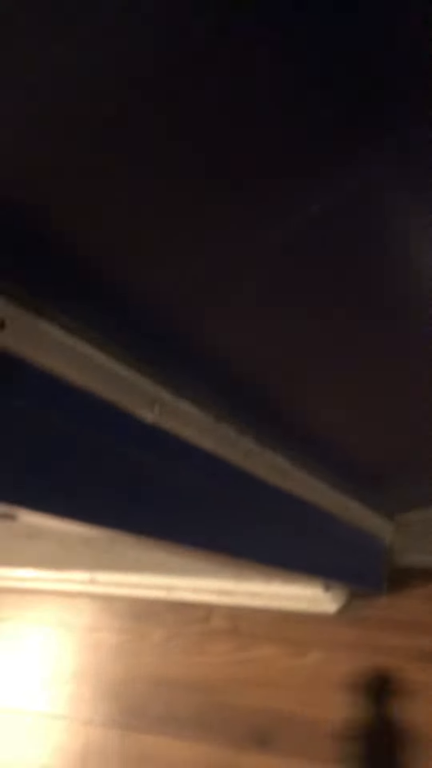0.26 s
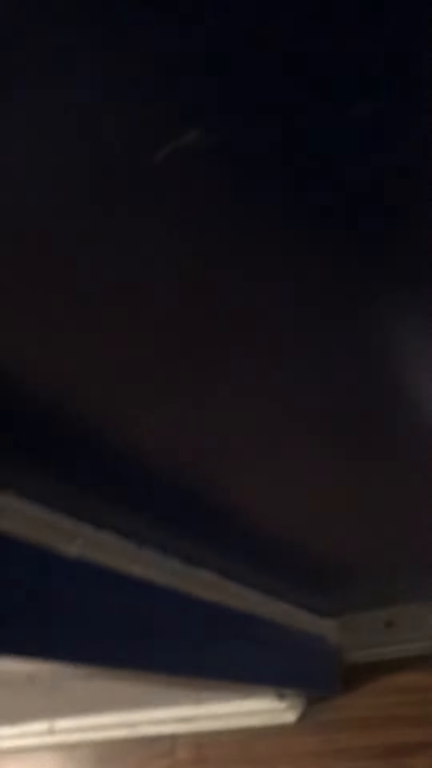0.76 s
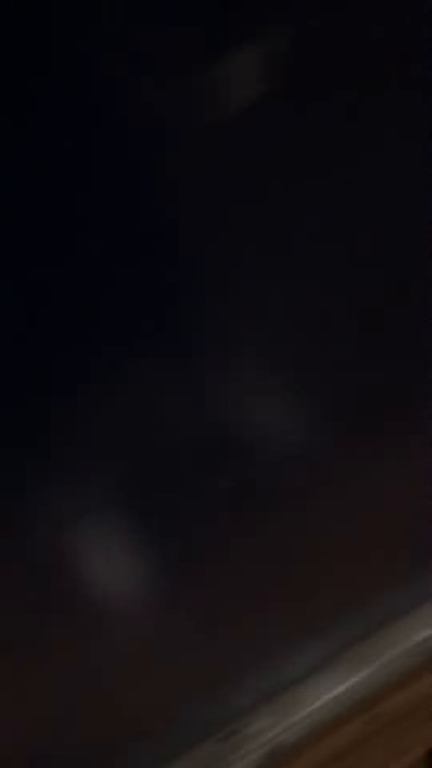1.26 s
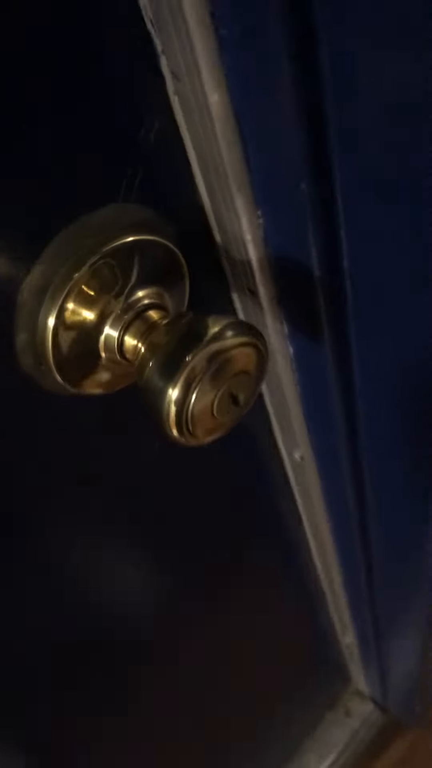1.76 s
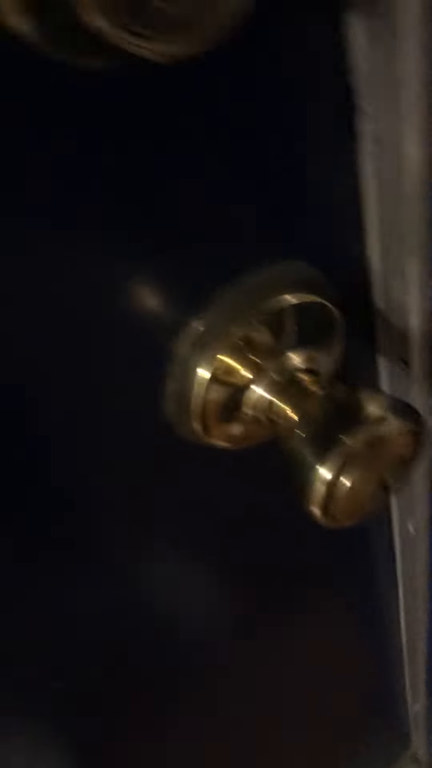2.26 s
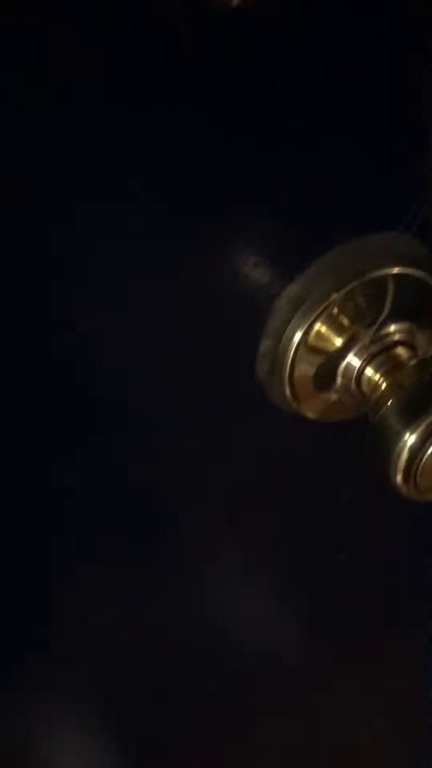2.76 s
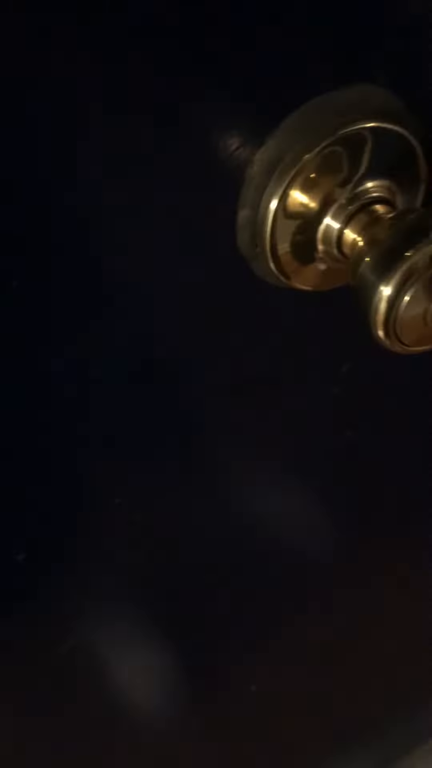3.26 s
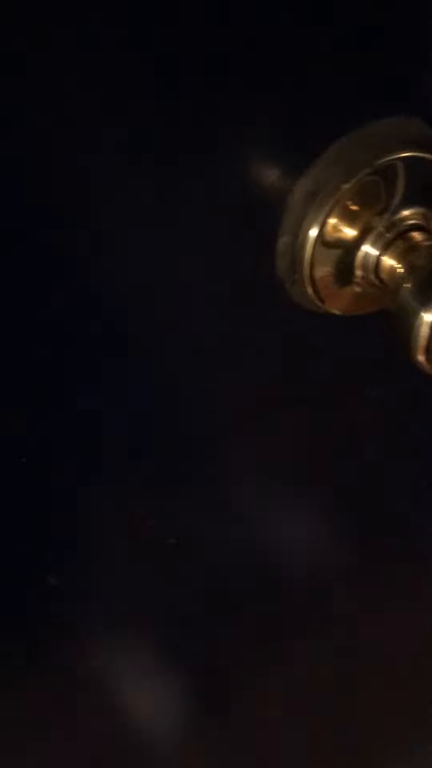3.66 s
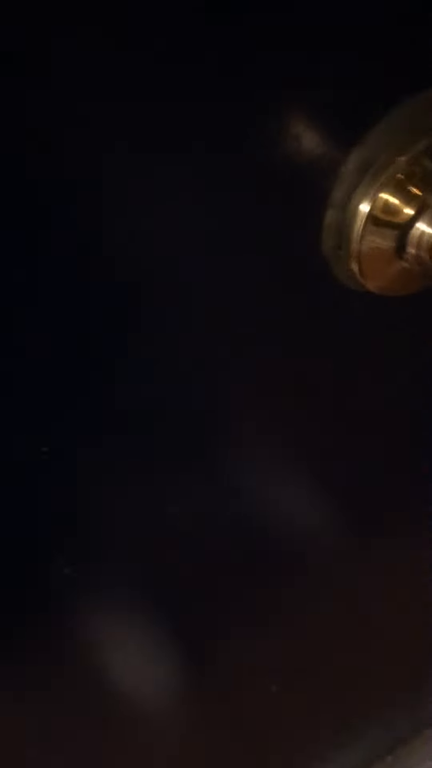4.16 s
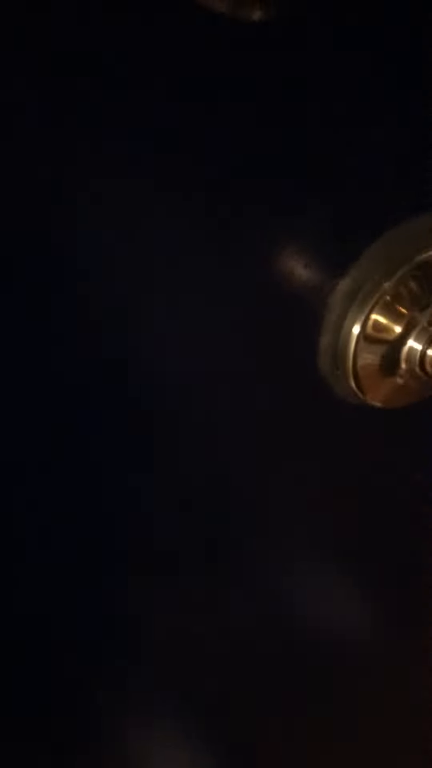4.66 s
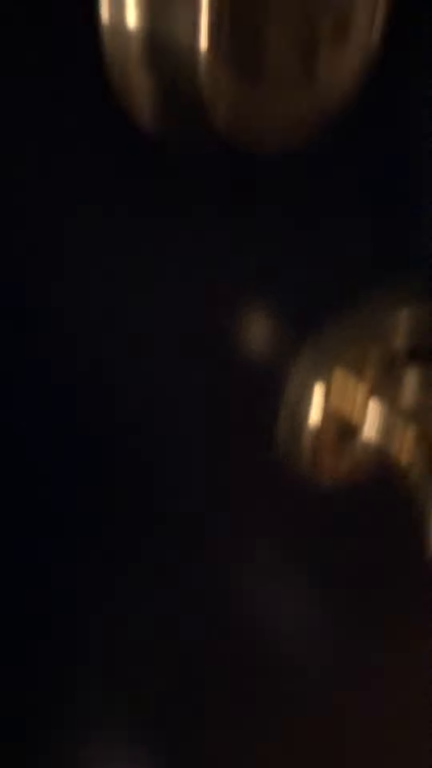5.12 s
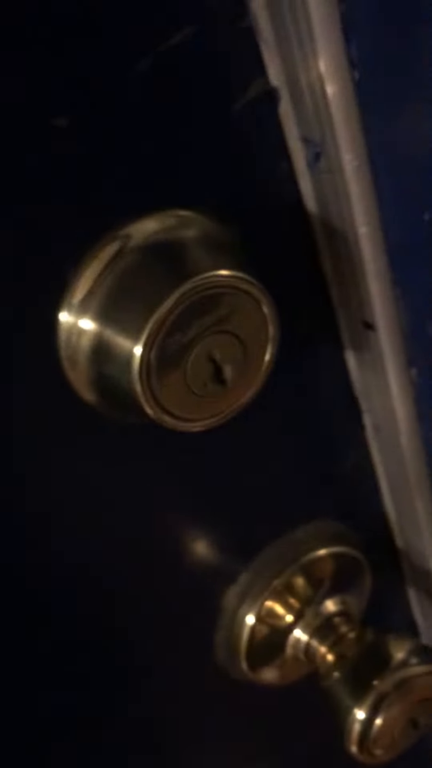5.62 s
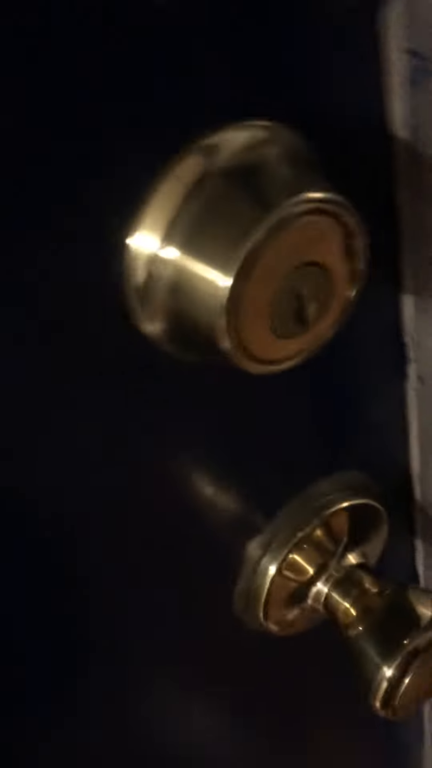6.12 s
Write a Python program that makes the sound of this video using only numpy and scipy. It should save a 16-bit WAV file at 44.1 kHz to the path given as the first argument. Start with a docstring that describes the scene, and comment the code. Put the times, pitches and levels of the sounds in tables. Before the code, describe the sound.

Door pushed shut with a rattling wooden thump, a brief sleeve rustle, then keys sorted in the hand, clinking ever more busily.

```python
"""Close to the microphone a bunch of keys is sorted in the hand: cracks, chatter and brass rings in four bands,
over a patter of tiny contacts; one small steel piece clicks with modes of its own.
Before that a wooden house door is pushed shut: noise bursts for latch and wood, ringing panel modes, low air sways.
A sleeve rustles as shaped, grainy noise. Behind it all lie the hallway's rumble and a soft background hiss,
both coloured noise."""
import sys
import numpy as np
from scipy import signal
from scipy.fft import rfft, irfft, next_fast_len
from scipy.io import wavfile
from scipy.ndimage import uniform_filter1d

SR = 44100
rng = np.random.default_rng(int(sys.argv[2]) if len(sys.argv) > 2 else 0)


def output_pcm(signal):
    """Save a mono or channel-first signal as 16-bit PCM at the path in sys.argv[1].

    Samples are clipped to [-1, 1] before scaling.
    """
    pcm = np.clip(np.atleast_2d(signal).T, -1, 1) * 32767
    wavfile.write(sys.argv[1], SR, np.round(pcm).astype(np.int16))


N = 281799  # length in samples


def amp(db):
    """Decibels to gain."""
    return 10 ** (np.asarray(db) / 20)


def unit(x):
    """Scale to rms 1."""
    return x / np.sqrt(np.mean(x ** 2) + 1e-20)


def strike(x):
    """Scale a hit so that its first 10 ms have rms 1."""
    return x / np.sqrt(np.mean(x[:SR // 100] ** 2) + 1e-20)


def along(points, hz):
    """Interpolate (Hz, value) points on a log frequency axis."""
    f, v = np.transpose(points)
    return np.interp(np.log(hz + 1), np.log(f + 1), v)


def curve(rows):
    """Interpolate (s, value) rows to one value per sample."""
    return np.interp(np.arange(N) / SR, *np.transpose(rows))


def fade(t60):
    """One second of exponential decay, falling 60 dB in t60 seconds."""
    return np.exp(-np.log(1000) * np.arange(SR) / SR / max(t60, 1e-3))


def add(track, s, sound):
    """Mix a sound in at time s."""
    start = max(round(s * SR), 0)
    track[start:start + len(sound)] += sound[:max(N - start, 0)]


def colour(x, spectrum):
    """Shape x by a smooth spectrum, at rms 1."""
    gain = amp(along(spectrum, np.fft.rfftfreq(len(x), 1 / SR)))
    return unit(irfft(rfft(x) * gain, len(x)))


def noise(spectrum, size=N):
    """Coloured noise of rms 1."""
    return colour(rng.standard_normal(size), spectrum)


def ring(modes, t60, scatter_db=0):
    """Clusters of close modes, excited differently at each point of contact."""
    hz = np.fft.rfftfreq(SR, 1 / SR)
    response = np.zeros(len(hz))
    for centre, width, db in modes:
        level = amp(db + scatter_db * rng.normal())
        response += level / (1 + ((hz - centre) / max(width, 2)) ** 2)
    random_phase = np.exp(2j * np.pi * rng.random(len(hz)))
    return unit(irfft(response * random_phase, SR)) * fade(t60)


def strokes(rows, rise, fall):
    """Gain of hand and arm movements: each swells, holds and dies away, at slopes in dB per s."""
    t = np.arange(N) / SR
    levels = []
    for start, length, db in rows:
        before = np.maximum(start - t, 0)
        after = np.maximum(t - start - length, 0)
        levels.append(db - rise * before - fall * after)
    return amp(np.max(levels, axis=0))


# Low rumble of the hallway, relative spectrum: f/Hz, level/dB
RUMBLE_SPECTRUM = [(12, -1), (20, -6), (49, 1.5), (61, 2), (76, -8), (102, -4), (173, -11.5), (296, -19),
                   (350, -23), (460, -29), (770, -120)]
# Background hiss, relative spectrum: f/Hz, level/dB
HISS_SPECTRUM = [(120, -17), (200, -2.5), (300, 1), (420, -2.5), (570, 4.5), (720, -4), (950, -1.5),
                 (1200, -7), (1500, -5.5), (1800, -9), (2250, -9), (3000, -13.5), (4200, -20.5),
                 (8000, -20.5), (12200, -20), (16000, -22)]
# Level of the background hiss: t/s, level/dB
HISS_LEVEL = [(0, -61.5), (.5, -59), (1.15, -56), (1.45, -63), (2.2, -56.5), (2.36, -63.5), (3.1, -59.5),
              (3.6, -60.5), (4.05, -66.5), (4.6, -60), (6.39, -65)]


def hallway():
    """Steady low rumble under a soft background hiss whose level is set over time."""
    rumble = amp(-61.5) * noise(RUMBLE_SPECTRUM)
    hiss = amp(curve(HISS_LEVEL)) * noise(HISS_SPECTRUM)
    return rumble + hiss


# Reverberation of the hallway walls: f/Hz, t60/s
WALL_DECAY = [(100, 0.69), (250, 1.0), (500, 0.72), (1500, 0.78), (4000, 0.98), (9000, 0.26), (16000, 0.44)]


def room(x):
    """The hallway's tail, 5 ms behind the direct sound: noise that decays at each frequency's own rate."""
    hz, t, z = signal.stft(rng.standard_normal(SR), SR, nperseg=256)
    decay = np.exp(-np.log(1000) * t / along(WALL_DECAY, hz)[:, None])
    tail = signal.istft(z * decay, SR, nperseg=256)[1]
    delayed = np.pad(tail / np.linalg.norm(tail), (SR // 200, 0))
    return signal.fftconvolve(x, delayed)[:N]


# Cloth brushing as the arm moves: start t/s, length t/s, level/dB
SLEEVE_STROKES = [(0, 1.0, -60), (1.14, .1, -50), (1.5, .03, -67), (2.18, 0.13, -70)]
# Brushed cloth, relative spectrum: f/Hz, level/dB
CLOTH_SPECTRUM = [(410, -56), (700, 0), (747, -5), (1090, -3), (1770, -1.5), (3370, -8), (4860, -2.5),
                  (7490, -5.5), (10700, 1), (16000, -18)]
# Strokes of ribbed fabric: start t/s, length t/s, level/dB
SWISH_STROKES = [(0, .025, -47), (1.14, 0.11, -52.5), (1.345, 0.087, -42), (1.53, 0.098, -55),
                 (5.76, 0.083, -54)]
# Sliding ribs, relative spectrum: f/Hz, level/dB
RIB_SPECTRUM = [(3000, -33), (4500, -14), (5000, 2), (5400, -0.5), (6200, -24), (8500, -14), (9700, 2.5),
                (11000, -3.5), (12500, -10), (16000, -14)]
SLEEVE_RISE_DB_PER_S, SLEEVE_FALL_DB_PER_S = 87, 140
SWISH_RISE_DB_PER_S, SWISH_FALL_DB_PER_S = 457, 330


def grain():
    """Gain that flickers finely at random, by 1.74 dB rms."""
    return amp(1.74 * unit(uniform_filter1d(rng.standard_normal(N), size=180)))


def sleeve():
    """Cloth brushes as the arm moves; sliding ribs give a pitched swish."""
    brush_gain = strokes(SLEEVE_STROKES, SLEEVE_RISE_DB_PER_S, SLEEVE_FALL_DB_PER_S)
    swish_gain = strokes(SWISH_STROKES, SWISH_RISE_DB_PER_S, SWISH_FALL_DB_PER_S)
    brush = brush_gain * noise(CLOTH_SPECTRUM) * grain()
    swish = swish_gain * noise(RIB_SPECTRUM) * grain()
    return brush + swish


# Air pushed by the door: t/s, f/Hz, starting peak level/dB, t60/s
AIR_SWAYS = [(0.621, 56, -12, 0.11), (0.674, 28, -18, 0.14), (0.785, 19, -31, 1.34)]


def pressure():
    """The leaf rocks against its seal and pumps the hallway air: decaying low sines."""
    out, t = np.zeros(N), np.arange(SR) / SR
    for s, hz, db, t60 in AIR_SWAYS:
        add(out, s, -amp(db) * np.sin(2 * np.pi * hz * t) * fade(t60))
    return out


# Blows on the door, levels before the trims in door():
# t/s, latch crack level/dB, wood knock level/dB, panel boom level/dB, crack t60/s
DOOR_BLOWS = [(.425, -30.5, -19.5, -37, 0.1), (.435, -45, -18.5, -21, .04),
              (0.4825, -16, -24.5, -27, 0.058), (.534, -36, -32.5, -35, 0.29),
              (.569, -26.5, -35, -30.5, 0.09), (.621, -26.5, -29, -24.5, 0.13),
              (.645, -53, -28.5, -26.5, .1), (.725, -41, -33.5, -29, 0.2)]
# Modes of the door leaf: f/Hz, half-width/Hz, relative level/dB
PANEL_MODES = [(123, 12.4, 6), (164.6, 18, 5.5), (244, 6.3, 0.5), (291, 28, -0.5), (375, 25, 1),
               (477, 50, 5), (546, 8.2, -27), (600, 5.9, -38), (760, 37, -1.5), (1045, 72, -2),
               (1317, 26, -2), (1460, 64, -30)]
# Wood knock, relative spectrum: f/Hz, level/dB
WOOD_SPECTRUM = [(60, -11), (250, -7.5), (400, -4), (520, 1.5), (780, 2.5), (1000, -9.5), (1450, -6.5),
                 (2500, -13), (5000, -26.5), (12000, -60)]
# Panel boom, relative spectrum: f/Hz, level/dB
BOOM_SPECTRUM = [(20, 5), (60, 5), (120, 2.5), (170, -4), (230, -10), (600, -8), (2000, -80)]
# Latch crack at the strike plate, relative spectrum: f/Hz, level/dB
LATCH_SPECTRUM = [(300, -53), (1000, 0.5), (1500, 0.5), (3000, 0), (5000, -6), (9000, -7.5), (12000, -14),
                  (16000, -36)]
# Latch snapping in, relative spectrum: f/Hz, level/dB
SNAP_SPECTRUM = [(500, -22), (1400, -26.5), (2300, 9), (4200, -9), (6000, -5.5), (8000, 5), (10500, 4),
                 (13000, -8), (16000, -22)]


def door():
    """Each blow cracks at the strike plate, knocks the wood and rings the leaf; the latch snaps in among them."""
    out = np.zeros(N)
    for s, crack_db, knock_db, boom_db, crack_t60 in DOOR_BLOWS:
        crack = strike(noise(LATCH_SPECTRUM, size=SR) * fade(crack_t60))
        knock = strike(noise(WOOD_SPECTRUM, size=SR) * fade(0.059))
        leaf = amp(-9.0) * ring(PANEL_MODES, t60=1.0)
        boom = noise(BOOM_SPECTRUM, size=SR) * fade(0.27)
        add(out, s, amp(crack_db - 11) * crack)
        add(out, s, amp(knock_db - 10.5) * (knock + leaf))
        add(out, s, amp(boom_db - 4.0) * boom)
    snap_decay = fade(0.021) + amp(-40) * fade(0.031)
    add(out, .625, amp(-27.5) * strike(noise(SNAP_SPECTRUM, size=SR) * snap_decay))
    return out + amp(-9.0) * room(out)


# Short ticks, low to very high: t/s, level/dB, f/Hz
SHORT_TICKS = [(1.619, -60.5, 3200), (1.734, -59, 3700), (3.021, -41, 2240), (3.063, -52.5, 2170),
               (4.763, -56, 2390), (4.804, -50, 2220), (4.834, -44, 5000), (4.896, -54.5, 1510),
               (4.937, -47.5, 1580), (4.938, -33, 3690), (5.601, -46, 4600), (5.603, -36.5, 13800),
               (5.865, -51, 3050), (5.888, -48, 2800), (5.9, -53, 2780), (6.214, -56.5, 2070),
               (6.217, -52, 920)]


def taps():
    """Short ticks, low to very high, each in one broad resonance that dies at once."""
    out = np.zeros(N)
    for s, db, hz in SHORT_TICKS:
        add(out, s, amp(db) * strike(ring([(hz, 0.076 * hz, 0)], t60=0.025)))
    return out


def tick(t60):
    """A contact crack: a decaying noise burst with a random ripple in its spectrum."""
    hz = np.linspace(500, 16000, 26)
    ripple_db = 5.5 * rng.standard_normal(len(hz))
    return noise(np.transpose([hz, ripple_db]), size=SR) * fade(t60)


# Dull knock under each clink; darker contacts knock more (dB per dB)
KNOCK_DB, KNOCK_PER_BRIGHT = -36.5, -0.45


def metal(contacts, modes, pitches, crack_t60, chatter_db, chatter_t60, ring_t60, scatter_db):
    """A contact is a crack, a chatter and one piece's ring; brightness and flex balance four registers."""
    # clink, knock, bending and sparkle bands (Hz)
    registers = [(4600, 10000), (900, 2800), (3100, 3900), (10500, 15800)]
    filters = [signal.butter(3, edges, "band", fs=SR, output="sos") for edges in registers]
    out, half = np.zeros(N), SR // 2
    for s, db, bright_db, flex_db, ring_db in contacts:
        piece = np.array(modes) * [rng.choice(pitches), 1, 1]
        bounces = unit(np.repeat(rng.exponential(size=SR // 60) ** 2, 60))  # steps of 60 samples
        chatter = amp(chatter_db) * bounces * tick(chatter_t60)
        contact = tick(crack_t60) + chatter
        ringing = amp(ring_db - 2) * ring(piece, ring_t60, scatter_db)
        hit = (contact + ringing) * (1 - fade(0.0088))  # soft onset
        clink, knock, bend, sparkle = (strike(signal.sosfilt(sos, hit[:half])) for sos in filters)
        knock_gain = amp(KNOCK_DB + KNOCK_PER_BRIGHT * bright_db)
        body = amp(-16.5) * clink + knock_gain * knock + amp(flex_db - 9.5) * bend
        top = amp(bright_db - 6) * sparkle * fade(1.0)[:half]  # the highest modes die first
        add(out, s, amp(db) * (body + top))
    return out


# Clicks of the steel piece, before the balance in metal():
# t/s, strength level/dB, brightness level/dB, flex level/dB, ring share level/dB
STEEL_CLICKS = [(3.021, -31, -14, -34, 2), (3.044, -26.5, -9, -27, 1), (3.061, -32, -8.5, -35, -5),
                (3.065, -35, 2.5, -31, -7)]
# Modes of the steel piece: f/Hz, half-width/Hz, relative level/dB
STEEL_MODES = [(2280, 24, -15), (5230, 2.9, -3), (6880, 12, -30), (8484, 13, -13), (9800, 11, -14),
               (11800, 8.7, 15.5), (11870, 56, -8), (12700, 25, -14)]


def steel():
    """One small steel piece clicks with its own modes."""
    return metal(STEEL_CLICKS, STEEL_MODES, [1], crack_t60=0.016, chatter_db=-25, chatter_t60=0.062,
                 ring_t60=0.11, scatter_db=-0.5)


# The fingers work through the bunch: start t/s, length t/s, rubbing level/dB
FINGER_WORK = [(2.13, 0.08, -66), (2.357, 0.09, -63.5), (3.545, .65, -69), (4.285, 0.28, -62.5),
               (4.905, 0.24, -53.5), (5.198, 0.075, -52), (5.38, .14, -66.5), (5.792, 0.11, -58.5),
               (6.129, 0.076, -60)]
HANDLING_RISE_DB_PER_S, HANDLING_FALL_DB_PER_S = 302, 130
# Chance contacts while the fingers work, and their typical colour
TOUCHES_PER_S, TOUCH_OVER_RUB_DB, TOUCH_SCATTER_DB = 9, 9, 2
TOUCH_BRIGHT_DB, TOUCH_FLEX_DB, TOUCH_RING_DB = 1, -13, -20


def light_touches():
    """Faint chance contacts while the fingers are busy, in the form of clink rows."""
    rows = []
    for start, length, db in FINGER_WORK:
        typical = [db + TOUCH_OVER_RUB_DB, TOUCH_BRIGHT_DB, TOUCH_FLEX_DB, TOUCH_RING_DB]
        for _ in range(round(length * TOUCHES_PER_S)):
            s = start + length * rng.random()
            rows.append((s, *rng.normal(typical, TOUCH_SCATTER_DB)))
    return rows


# Each listed clink jostles the other keys: level under the clink, gain with flex (dB per dB), rise and settling
JOSTLE_DB, JOSTLE_PER_FLEX, JOSTLE_RISE_S, JOSTLE_T60 = -21, 0.75, 0.0099, 0.31


def jostle():
    """The fingers and every listed clink stir the bunch; the energies add up and settle."""
    energy = strokes(FINGER_WORK, HANDLING_RISE_DB_PER_S, HANDLING_FALL_DB_PER_S) ** 2
    settle = (1 - fade(JOSTLE_RISE_S)) * fade(JOSTLE_T60)
    for s, db, _, flex_db, _ in KEY_CLINKS:
        stir = amp(db + JOSTLE_DB + JOSTLE_PER_FLEX * flex_db) * settle
        add(energy, s, stir ** 2)
    return np.sqrt(energy)


# Tiny rubbing contacts, relative spectrum: f/Hz, level/dB
RUB_SPECTRUM = [(700, -15.5), (2000, -2), (2900, 1), (3500, -8.5), (4300, -7), (5200, 4), (7000, -2),
                (9500, -2), (14000, -5), (16000, -21)]
KEY_SCATTER_DB = 5  # spread of a key's mode levels from ring to ring


def rubbing_key():
    """One key touched about 45 times a second, at random, with a tick and a short ring."""
    touches = (rng.random(N) < 45 / SR) * rng.standard_normal(N)
    response = tick(0.015) + amp(-5.5) * ring(BRASS_MODES, t60=0.071, scatter_db=KEY_SCATTER_DB)
    return signal.fftconvolve(touches, response)[:N]


def patter():
    """Six rubbing keys together, as loud as the bunch is stirred."""
    rubbing = sum(rubbing_key() for _ in range(6))
    return jostle() * colour(rubbing, RUB_SPECTRUM)


# Clinks in the bunch, before the balance in metal():
# t/s, strength level/dB, brightness level/dB, flex level/dB, ring share level/dB
KEY_CLINKS = [(.045, -51.5, 12, 6, -17), (1.479, -39, -16, -7.5, -23), (1.521, -36, 0.5, -30, -59),
              (1.678, -40.5, -18, -9.5, -19), (1.7948, -33, -9, -4.5, -10), (1.825, -35.5, -8, -13, -4),
              (1.843, -41, -13, -24, -24), (2.048, -38.5, -1.5, -12, -7), (2.107, -34, -7, -22, -3),
              (2.146, -45.5, 4, -26, -2), (2.17, -37, -36, -8, -22), (2.186, -37.5, -9, -9, -17),
              (2.255, -45.5, -22, -5, -24), (2.4333, -26, -16, -9.5, -9), (2.445, -28, -4, -18, -3),
              (2.5353, -43, -7, -1, -6), (2.557, -41, -6, -12, -22), (2.721, -49.5, -22, -5, -21),
              (3.496, -46, -3.5, 1, -11), (3.552, -44.5, -5, -3, -15), (3.593, -39, 0.5, -33, -18),
              (3.615, -36, -13, -3.5, -11), (3.678, -43, -6.5, -12, -7), (3.778, -32, -4, -18, -17),
              (3.804, -36, -5, -18, -6), (3.885, -32.5, -15, -9, -20), (3.898, -52, -10, 3, -14),
              (4.066, -50, -4, -17, -8), (4.201, -48.5, -1, -19, -1), (4.2511, -35, -9.5, -16, -12),
              (4.291, -35, -6.5, -3.5, 1), (4.307, -33, -5, -9, -1), (4.345, -37, 2, -11, -17),
              (4.46, -35.5, -7, -1, -16), (4.623, -40.5, -15, -20, -29), (4.704, -42, -11, -11, -16),
              (4.761, -35.5, -19, -11, -14), (4.803, -31.5, -5.5, -12, -1), (4.834, -25.5, -14, -15.5, -7),
              (4.856, -36, 1, -9, -22), (4.8946, -16, -6.5, -18.5, -11.5), (4.9363, -18.5, -14, -5, -5),
              (4.978, -22.5, -4.5, -31, 3), (5.036, -32, 0, -8, -6), (5.105, -33, -4, -20, 6),
              (5.141, -30, -8, -38, -22), (5.175, -24.5, -8, -26, -8), (5.191, -30, 0, -16, 7),
              (5.3336, -28.5, -10, -12, -21), (5.428, -49, -4, -0.5, -8), (5.568, -35, -3, -12, -5),
              (5.601, -29, -2.5, -9.5, -20), (5.676, -37.5, -34, -10, -5), (5.74, -37.5, -10, -28, -16),
              (5.821, -40, -17, -2, -19), (5.8527, -25.5, -13, -12.5, -9), (5.8638, -24.5, -31, -16, -12),
              (5.886, -35.5, -3, -19, 1), (5.943, -22.5, -9, -14, -18), (5.957, -39.5, 5.5, -23, 9),
              (6.021, -33, -14, -11, -14), (6.063, -24, -9.5, -37, -14), (6.0738, -34.5, 8, -9, 4),
              (6.0834, -26, -3.5, -22, -31), (6.098, -44, 10, -19, -11), (6.177, -36.5, -14, -16, 2),
              (6.2203, -28.5, -17, -14, -23), (6.2312, -35.5, -16, -11, -24), (6.273, -44, -17, -1, -21),
              (6.314, -37, -18, -14, -22), (6.376, -40.5, -4.5, -17, -17)]
# Modes of a brass key on its ring: f/Hz, half-width/Hz, relative level/dB
BRASS_MODES = [(3315, 25, 2), (3420, 55, 1), (3650, 70, -3), (5017, 70, -9), (6030, 150, -12),
               (6790, 40, -9), (7500, 250, -11), (8660, 110, -2), (9358, 40, -1), (9755, 80, -8),
               (10370, 60, -6), (11045, 40, 1), (11870, 90, -8), (12170, 70, 1), (13526, 120, -6),
               (13823, 40, 3), (15240, 70, -1)]
# Relative pitch of the keys in the bunch: factor on f [no unit]
KEY_PITCHES = [1, 1, 1, 1, .985, 1.01]


def bunch():
    """Brass keys clink in the hand, with light touches at random times while the fingers work."""
    return metal(KEY_CLINKS + light_touches(), BRASS_MODES, KEY_PITCHES, crack_t60=0.014,
                 chatter_db=-12.5, chatter_t60=0.054, ring_t60=0.15, scatter_db=KEY_SCATTER_DB)


def keys():
    """Keys, steel and short ticks over a patter of tiny contacts, close by, with some of the hallway's tail."""
    out = bunch() + steel() + taps() + patter()
    return out + amp(-11) * room(out)


def scene():
    """All sources at one microphone."""
    return (hallway() + sleeve() + pressure() + door() + keys())[None]


def record(dry):
    """The recorder keeps nothing above its band limit of 15850 Hz."""
    size = next_fast_len(N + SR)
    passed = np.fft.rfftfreq(size, 1 / SR) < 15850
    return irfft(rfft(dry, size) * passed, size)[..., :N]


dry = scene()
out = record(dry)
output_pcm(out)
```